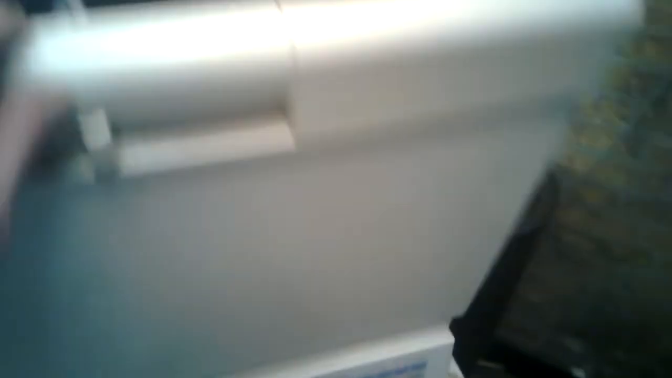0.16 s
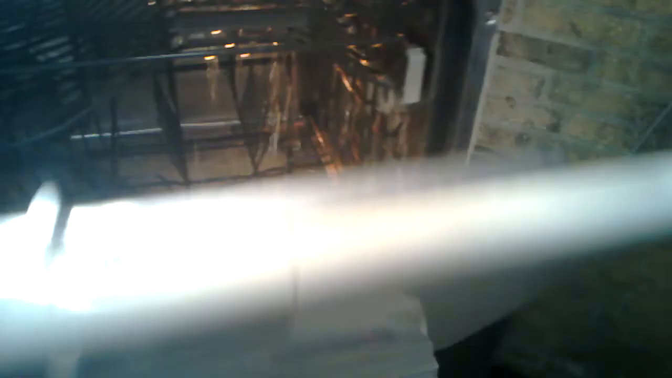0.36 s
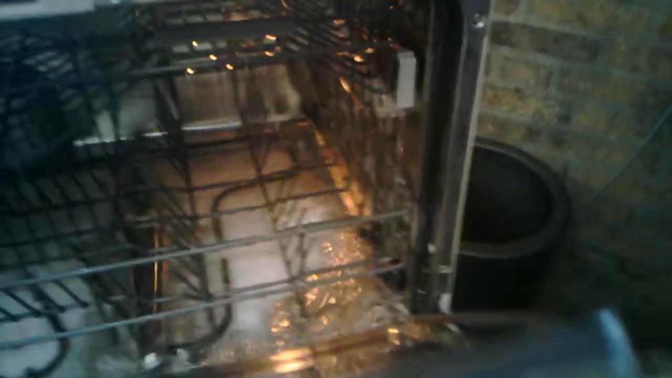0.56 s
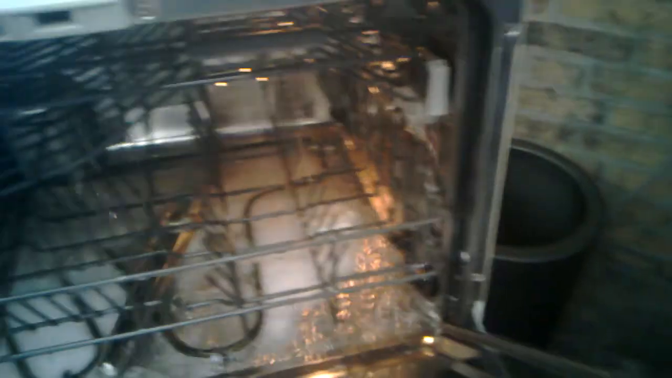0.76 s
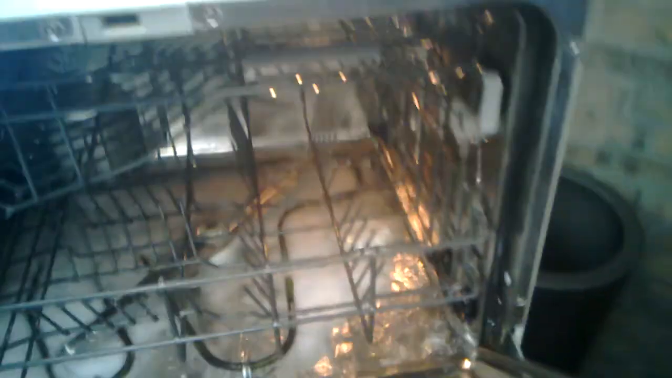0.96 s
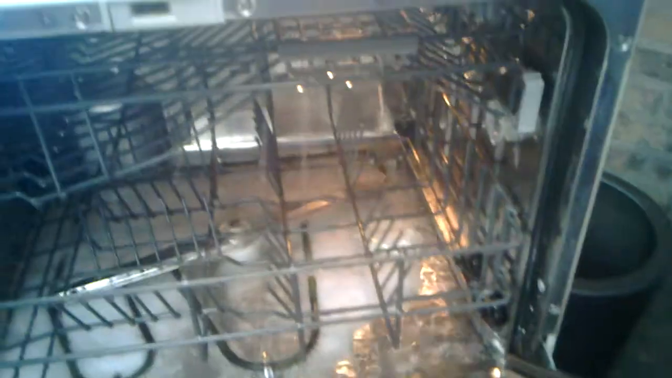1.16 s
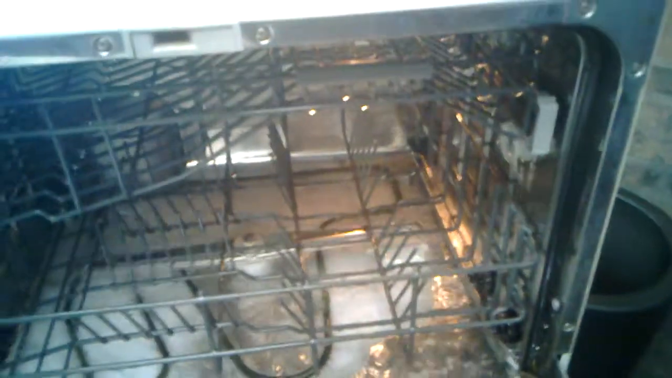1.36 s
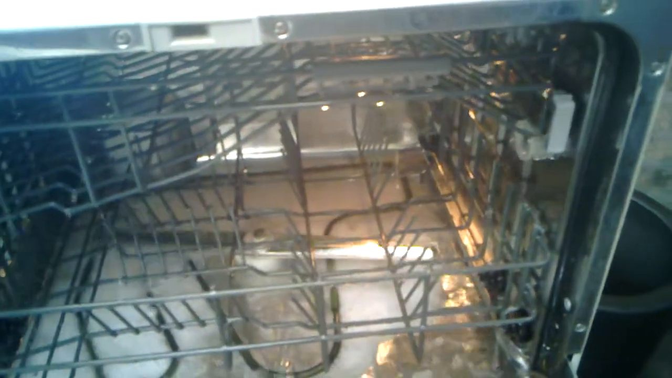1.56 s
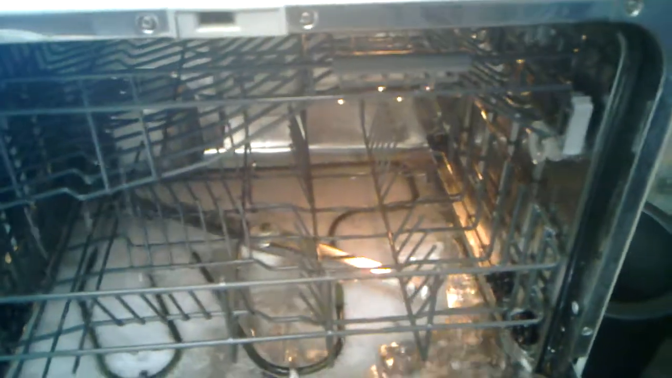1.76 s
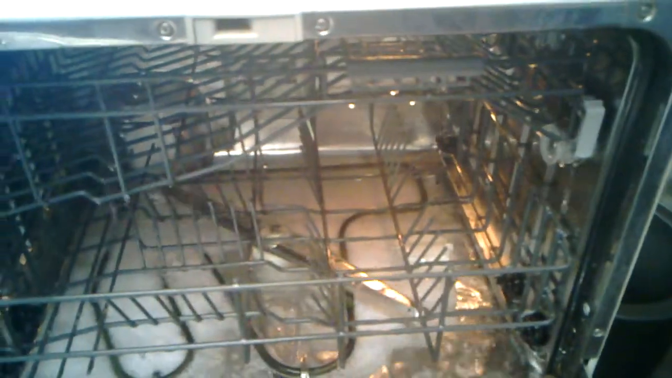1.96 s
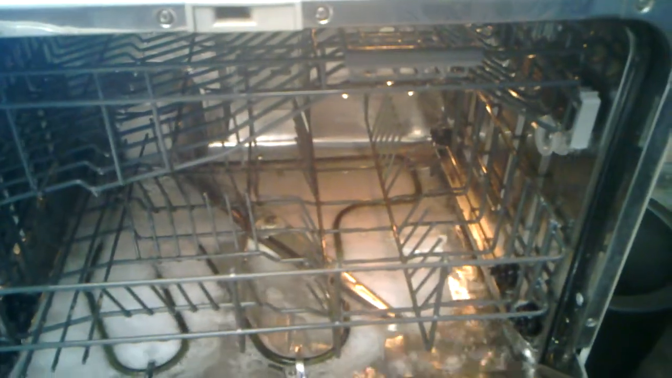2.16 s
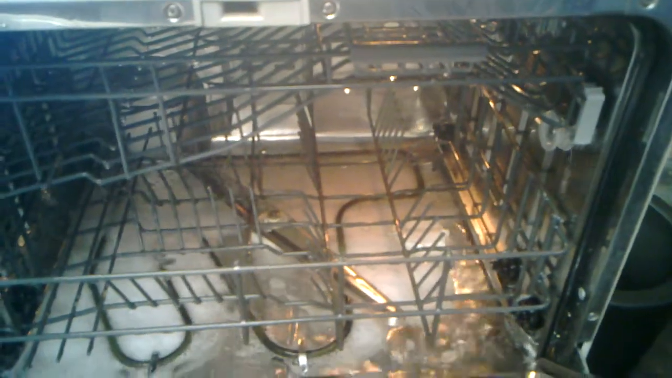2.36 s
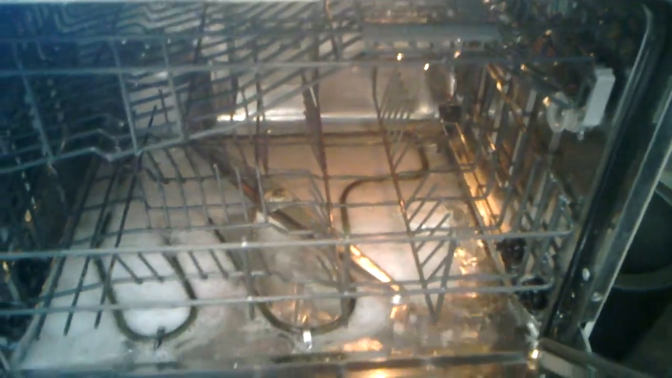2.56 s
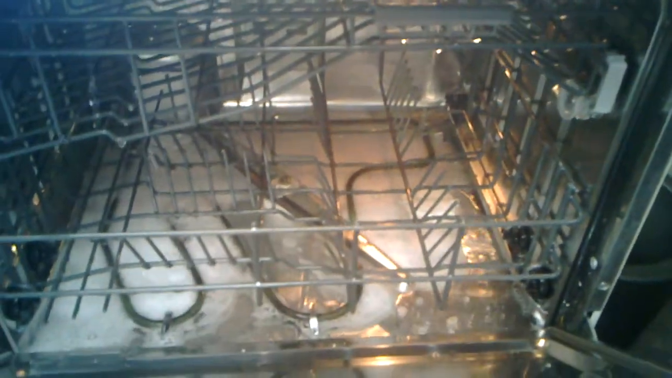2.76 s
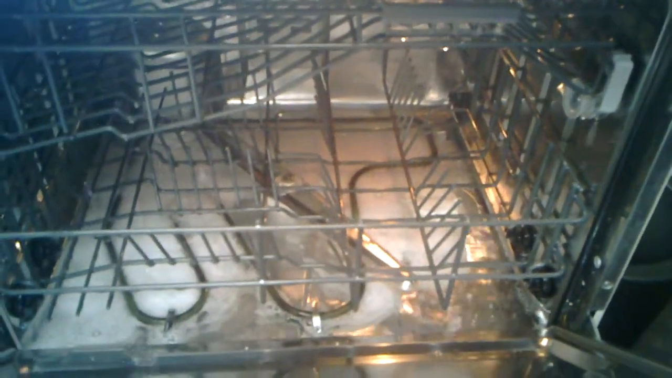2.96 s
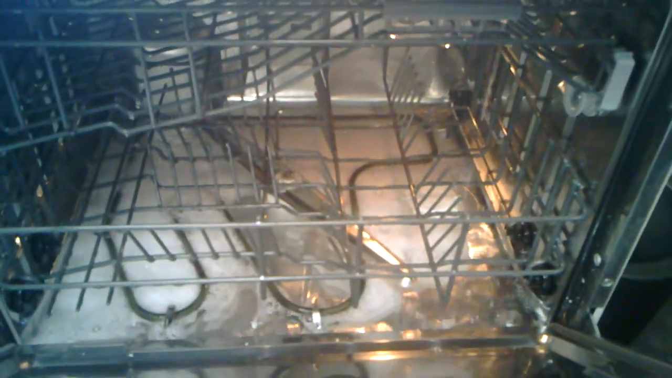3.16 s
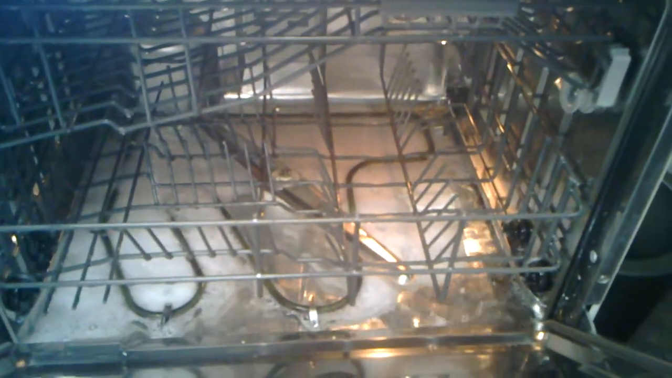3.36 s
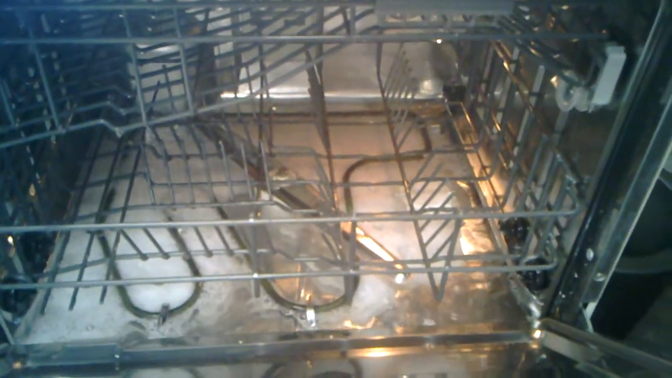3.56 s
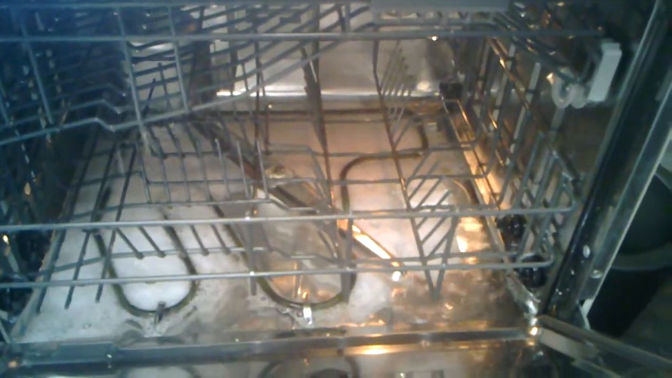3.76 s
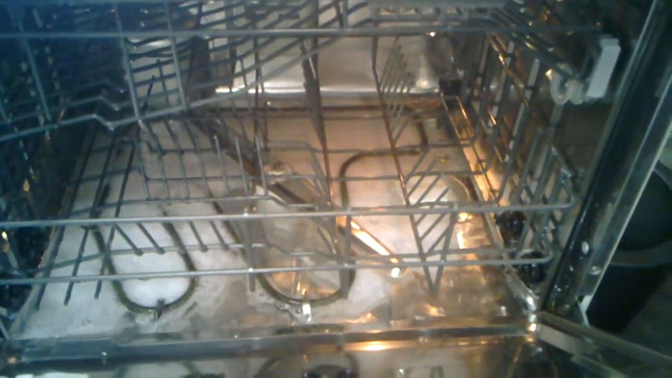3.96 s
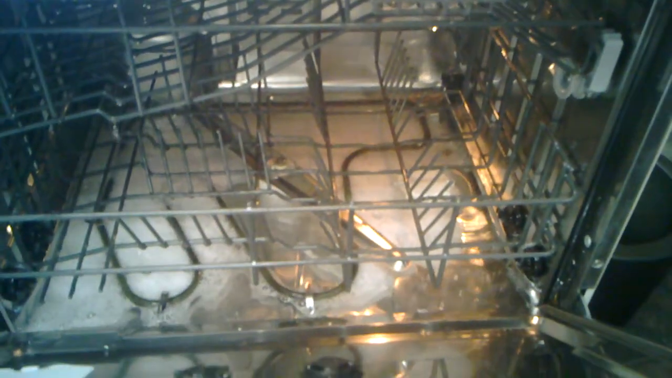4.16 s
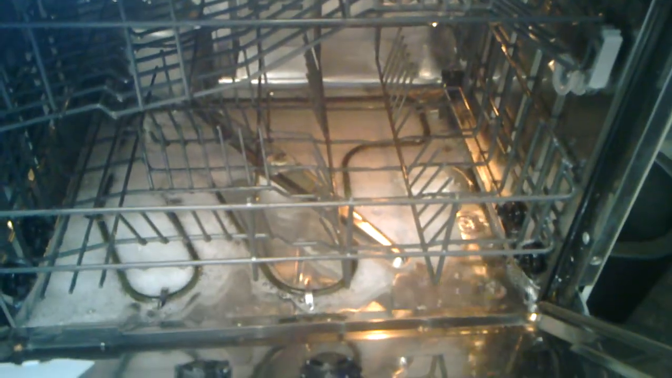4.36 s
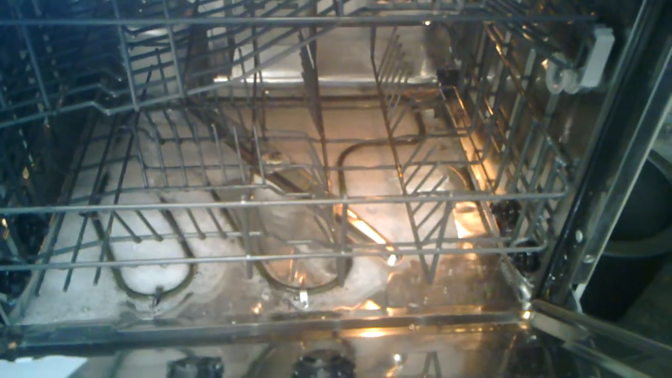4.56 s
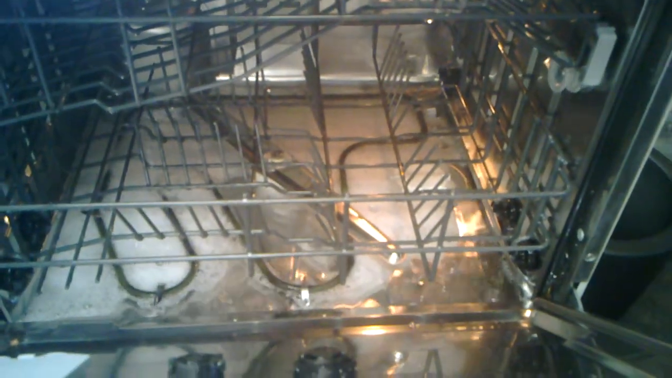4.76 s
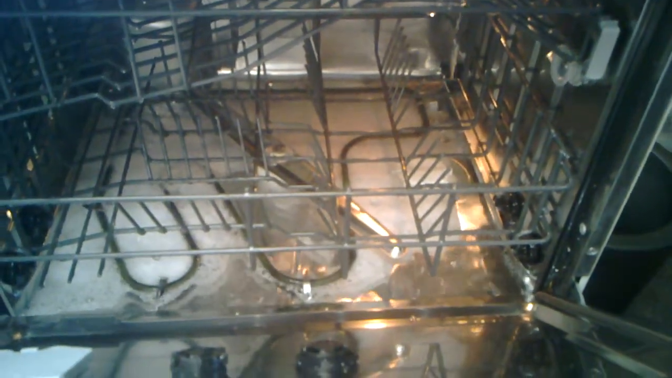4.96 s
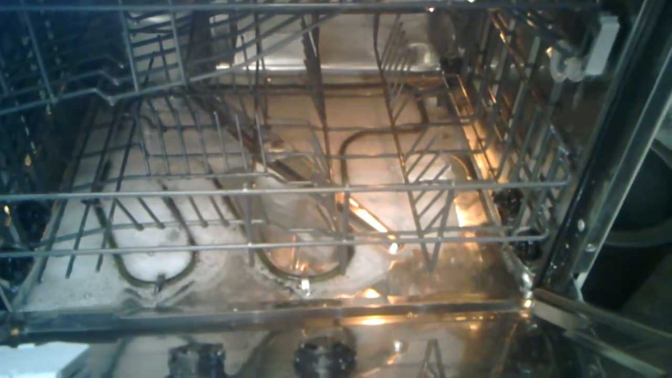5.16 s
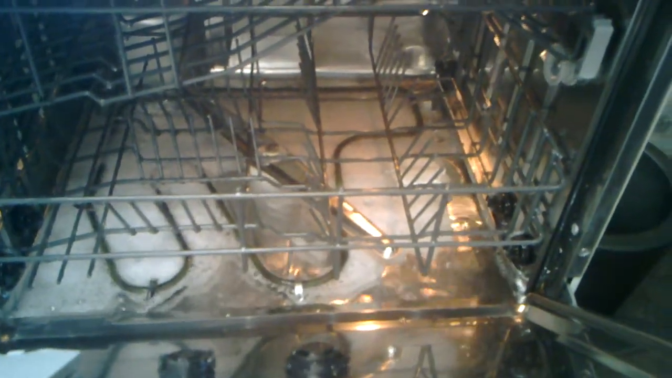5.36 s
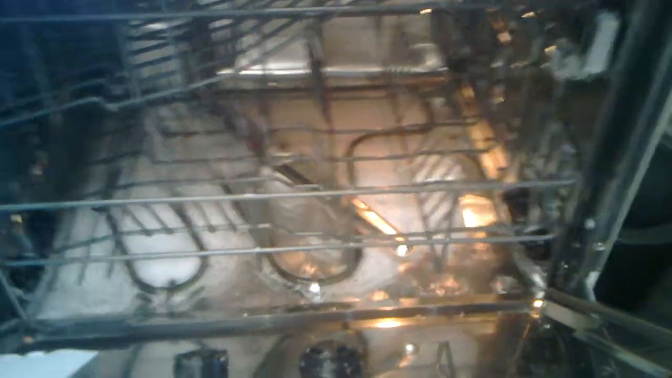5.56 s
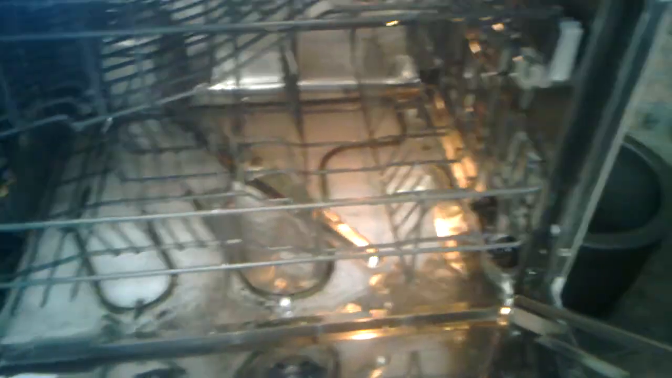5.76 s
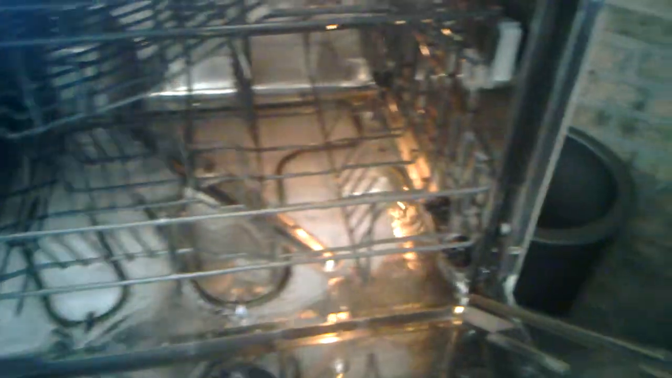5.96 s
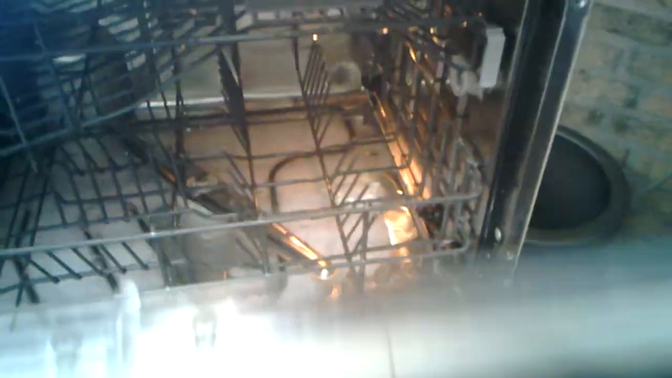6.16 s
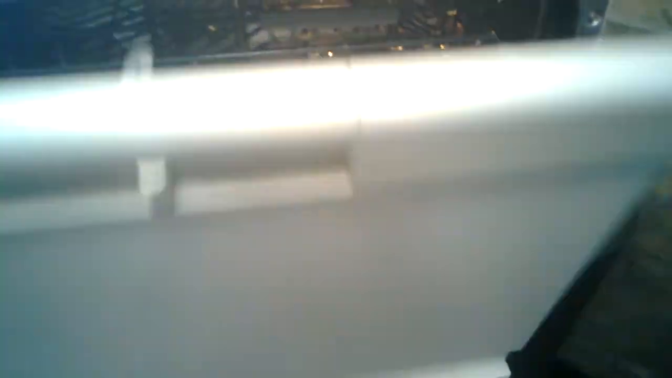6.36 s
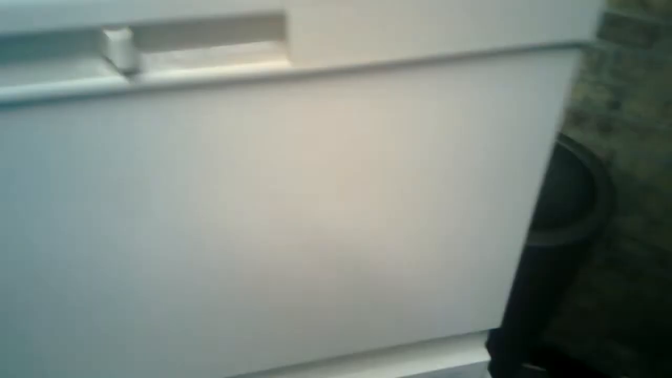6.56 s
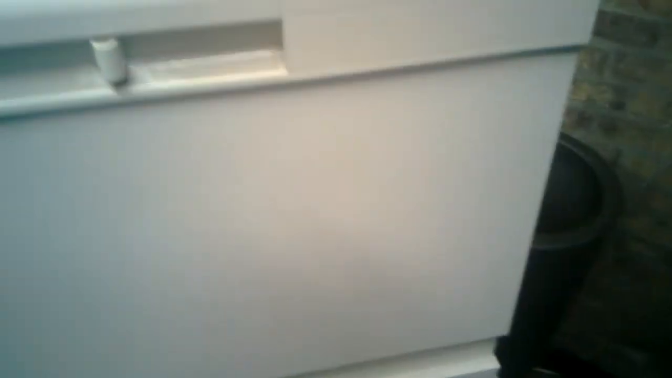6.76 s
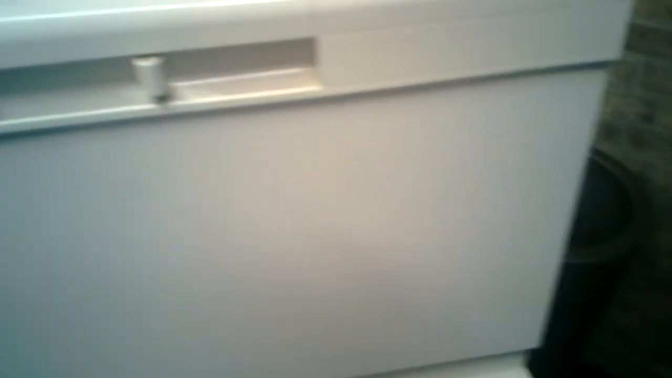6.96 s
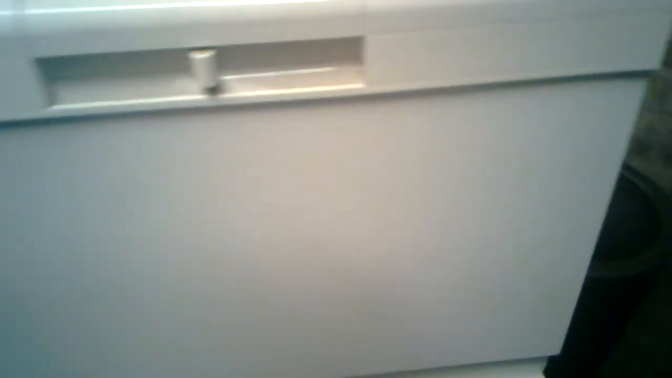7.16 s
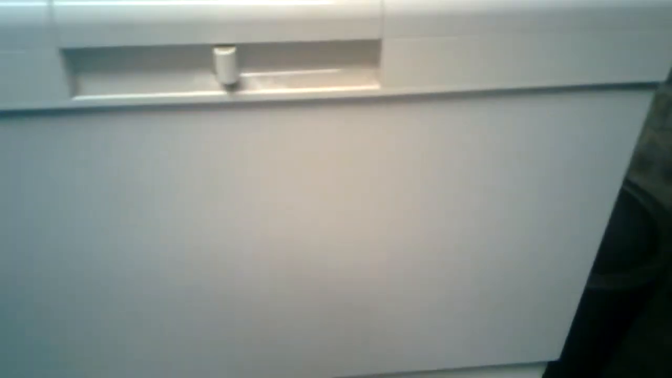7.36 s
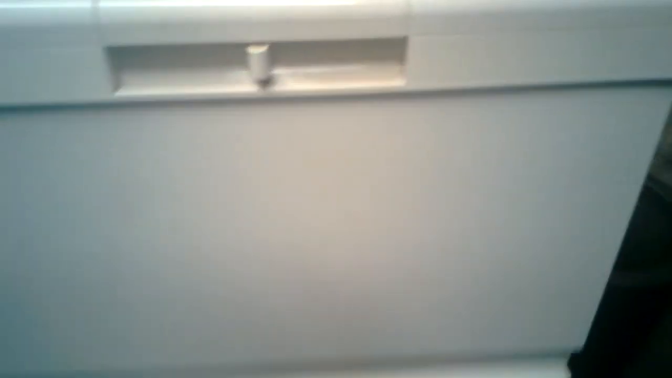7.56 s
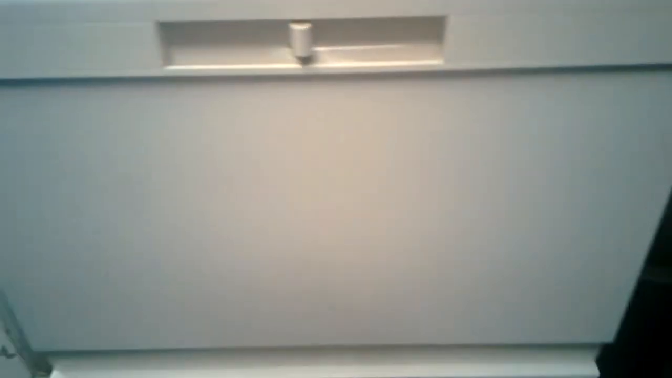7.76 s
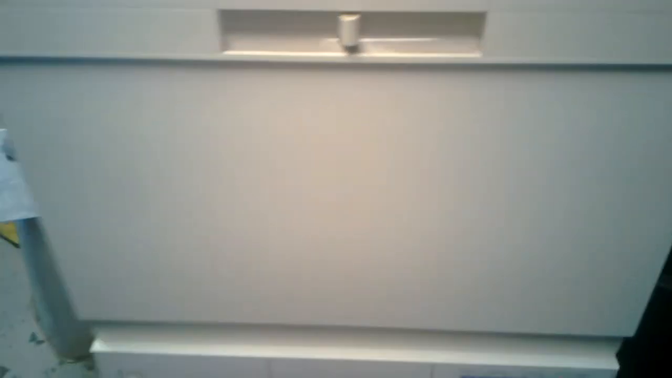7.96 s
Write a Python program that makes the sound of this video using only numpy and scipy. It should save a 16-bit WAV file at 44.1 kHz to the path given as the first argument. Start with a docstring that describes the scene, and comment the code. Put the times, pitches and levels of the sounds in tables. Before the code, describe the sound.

A running dishwasher is opened: its motor tone fades while jets of water slap the steel tub in bursts, slowing within about a second and a half. Drips plink into the sump, growing sparse. The door swings up with a creaky rub, knocks and latches with sharp clacks, then the pump starts, humming with muffled spray. Close microphone, small kitchen, soft hiss.

```python
"""A running dishwasher is pulled open: its motor cuts out and the slowing arm's jets, random impacts
through steel resonances, slap the tub. Gliding sine bubbles and noise ticks then drip into the sump.
The door swings up on a rubbing hinge, knocks shut (filtered noise bursts) and is latched.
The pump starts, gulping air; water hisses behind the door in coloured impacts and the cabinet hums.
Room hiss and a short kitchen echo lie under it all; layer levels are relative, set by the mix gains."""
import sys
import numpy as np
from scipy import signal
from scipy.fft import rfft, irfft
from scipy.io import wavfile

SR = 44100
rng = np.random.default_rng(int(sys.argv[2]) if len(sys.argv) > 2 else 0)


def wav_record(signal):
    """Record a signal, one row per channel, as 16-bit PCM in the file named by sys.argv[1]."""
    frames = np.transpose(np.atleast_2d(signal))
    bounded = np.clip(frames, -1, 1)
    # unit amplitude maps onto the largest positive 16-bit level
    quanta = np.round(bounded * 32767).astype(np.int16)
    wavfile.write(sys.argv[1], SR, quanta)


N = 353241
T = np.arange(N) / SR

ARM_SLOW_S = 1.12  # the spray arm has slowed
SWING_START_S, LATCH_S = 5.993, 6.46  # the door starts to swing; it meets its catch

# drops plinking into standing water: (time [s], level [dB], bubble pitch [Hz], t60 [s])
DRIP_EVENTS = [(0.329, -35, 2180, 0.068), (0.864, -49, 1106, 0.48), (0.964, -33, 1088, 0.12),
               (1.374, -43.5, 1476, 0.057), (1.427, -52.5, 1058, .08), (1.628, -55.5, 1630, 0.043),
               (1.787, -61, 3620, 0.026), (1.846, -49.5, 2920, 0.016), (1.9557, -34, 1470, 0.0057),
               (1.959, -46, 2570, 0.033), (2.0213, -30, 1750, 0.0069), (2.024, -44, 2130, 0.032),
               (2.0445, -32.5, 1120, 0.036), (2.059, -38, 1095, 0.082), (2.069, -41.5, 3130, 0.013),
               (2.131, -47, 1600, 0.01), (2.160, -43.5, 2063, 0.0068), (2.167, -32.5, 1010, 0.029),
               (2.268, -49.5, 3020, .025), (2.386, -57.5, 4250, 0.027), (2.732, -52, 2940, 0.015),
               (2.757, -51.5, 3030, 0.024), (2.760, -43.5, 1069, 0.043), (3.063, -52.5, 2460, 0.037),
               (3.076, -51, 2230, 0.049), (3.617, -57, 2110, 0.014), (3.679, -54, 1970, 0.029),
               (3.761, -53, 2270, 0.03), (3.822, -41.5, 3810, 0.014), (3.824, -37, 2390, 0.031),
               (3.832, -39, 2314, 0.039), (4.26, -60, 1090, .06), (4.302, -56.5, 2160, 0.016),
               (4.389, -56, 3210, 0.052), (4.525, -56, 1080, 0.055), (5.019, -61, 1080, .04),
               (5.113, -55, 2670, 0.0084), (5.165, -55.5, 4760, 0.01), (5.796, -62, 2350, 0.011),
               (5.817, -58.5, 3325, 0.047)]


def amp(db):
    """Decibels to gain."""
    return 10 ** (np.asarray(db) / 20)


def unit(x):
    """Scale a response to energy 1."""
    return x / np.sqrt(np.sum(x ** 2))


def fall(t, t60):
    """Exponential decay, 60 dB in t60 seconds."""
    return np.exp(-np.log(1000) * np.maximum(t, 0) / t60)


def stroke(start_s, rise_s, t60):
    """Envelope that rises straight, then dies away."""
    return np.clip((T - start_s) / rise_s, 0, 1) * fall(T - start_s - rise_s, t60)


def through(x, response):
    """Pass a sound through an impulse response."""
    return signal.oaconvolve(x, response)[:len(x)]


def add(out, s, x):
    """Mix x into out from time s."""
    i = max(int(s * SR), 0)
    out[i:i + len(x)] += x[:N - i]


def bandpass(x, edges_hz):
    """Second-order Butterworth band-pass."""
    return signal.sosfilt(signal.butter(2, edges_hz, "band", fs=SR, output="sos"), x)


def colour(x, spectrum, size=4096):
    """Minimum-phase filter of energy 1 from (frequency [Hz], level [dB]) points."""
    hz, db = np.transpose(spectrum)
    freqs = np.maximum(np.arange(size // 2 + 1) * SR / size, 1)
    cepstrum = irfft(np.log(amp(np.interp(np.log(freqs), np.log(hz), db))))
    # fold the cepstrum to make the filter causal
    cepstrum[1:size // 2] *= 2
    cepstrum[size // 2 + 1:] = 0
    return through(x, unit(irfft(np.exp(rfft(cepstrum)))))


def ring(x, modes, size=12000):
    """Damped modes, each with its own share of the energy."""
    t, response = T[:size], 0
    for hz, width_hz, db in modes:
        mode = np.exp(-np.pi * width_hz * t) * np.sin(2 * np.pi * hz * t)
        response = response + amp(db) * unit(mode)
    return through(x, unit(response))


def echoes(x, t60, gap_s, size=16000):
    """Dense decaying reflections that begin after a short gap."""
    t = T[:size]
    return through(x, unit(rng.standard_normal(size) * fall(t, t60) * (t > gap_s)))


def patter(rate):
    """Random impacts, `rate` a second on average, rms near 1."""
    return (rng.random(N) < rate / SR) * rng.standard_normal(N) * np.sqrt(SR / rate)


def walk(rate):
    """Random drift: straight lines between `rate` Gaussian points a second."""
    return np.interp(T * rate, np.arange(2048), rng.standard_normal(2048))


def plinks(rows, rise_cycles, glide, size=9000):
    """Each bubble swells within a cycle or so, rings down and rises in pitch by the glide."""
    out, t = np.zeros(N), T[:size]
    for s, db, hz, t60 in rows:
        swell = (1 - np.exp(-(t * hz / rise_cycles) ** 2)) * fall(t, t60)
        cycles = np.cumsum(hz * (1 + glide * (.5 - fall(t, t60)))) / SR
        add(out, s, amp(db) * swell / swell.max() * np.sin(2 * np.pi * cycles))
    return out


def grains(rate, low_hz, high_hz, cycles, spread_db, size=900):
    """Tiny bubbles of random pitch and strength, each ringing for a few cycles."""
    out, t = np.zeros(N), T[:size]
    starts = np.flatnonzero(rng.random(N) < rate / SR)
    for i, (pitch, strength) in zip(starts, rng.random((len(starts), 2))):
        hz = low_hz * (high_hz / low_hz) ** pitch
        ping = unit(np.sin(2 * np.pi * hz * t) * fall(t, cycles / hz))
        level = 2 * amp(-spread_db * np.sqrt(strength)) * np.sqrt(SR / rate[i])
        add(out, i / SR, ping * level)
    return out


def shimmer(x, depth_db, rate):
    """Each half-octave swells and sinks on its own as the point of impact wanders."""
    spectrum, out = rfft(x), 0
    hz = np.maximum(np.arange(len(spectrum)) * SR / N, 1)
    place = np.clip(2 * np.log2(hz / 300), 0, 10)  # half-octaves above 300 Hz
    for band in range(11):
        gain = amp(depth_db * walk(rate))
        part = irfft(spectrum * np.maximum(1 - np.abs(place - band), 0), N)
        out = out + part * gain / np.sqrt(np.mean(gain ** 2))
    return out


def room_hiss():
    """Steady background hiss: coloured noise with a slight drift in level."""
    # spectrum: (frequency [Hz], level [dB])
    room_spectrum = [(15, -23), (44, -20), (120, -12), (300, -9.5), (527, -13), (1060, -11), (1300, -13.5),
                     (2260, -12.5), (2820, -17), (3950, -19.5), (4600, -25.5), (11100, -23.5), (14700, -26),
                     (16000, -22)]
    return colour(rng.standard_normal(N), room_spectrum) * amp(-69.5 + .5 * walk(3.46))


def cabinet_rumble():
    """Low noise of the cabinet, at rest, shaken by the door and driven by the jets."""
    # spectrum: (frequency [Hz], level [dB])
    cabinet_spectrum = [(15, -26), (30, -5), (48, 2), (70, -5), (105, -5), (170, -9), (500, -46.5)]
    rest_db, shaken_db, shaken_t60_s = -79.5, -72, 5.7
    shaking = amp(rest_db + 1.6 * walk(4.7))
    shaking += amp(shaken_db) * stroke(LATCH_S, .15, shaken_t60_s)
    shaking += amp(-38) * np.sqrt(showers())
    return colour(rng.standard_normal(N), cabinet_spectrum) * shaking


def gulps():
    """Gulps of air in the filling pump ring as bubbles."""
    # (time [s], level [dB], pitch [Hz], t60 [s])
    gulp_events = [(7.337, -50, 955, 0.043), (7.3675, -35, 425, 0.019), (7.368, -46.5, 720, 0.012),
                   (7.391, -46, 1720, .035)]
    return plinks(gulp_events, rise_cycles=0.9, glide=0.018)


def pump():
    """Motor tones die at the opening; later noise drives the cabinet and spray patters on the door."""
    # motor tones as it cuts out: (frequency [Hz], level [dB])
    motor_tones = [(113, -47), (226, -55.5), (393, -57)]
    # spray on the door, then pump noise: (frequency [Hz], level [dB])
    wash_spectrum = [(240, -40), (400, -3.5), (520, -25), (700, -6), (1150, 1), (1350, -3.5), (1720, 2.5),
                     (2200, 0), (3000, -9), (4100, -20.5), (9400, -26.5), (14000, -27.5)]
    pump_spectrum = [(25, -20), (70, -15), (110, -18), (150, 6), (280, 1), (370, -5.5), (550, -6.5),
                     (1200, -33.5)]
    # driven cabinet resonances: (frequency [Hz], width [Hz], level [dB])
    hum_modes = [(101.4, 2.7, -16.5), (136, 2.3, -5.5), (160.5, 3.5, -3), (216, 14, -10), (262, 14, -12),
                 (280.2, 6, -0.5)]
    start_s, rise_s = 6.828, 0.044
    wash_db, wash_surge_db, wash_surge_t60_s, shut_wash_db = -63, -56, 1.72, -69.5
    load_db, load_surge_db, load_surge_t60_s = -61.5, -63, 0.29
    swell_s, swell_width_s, swell_db = 7.95, 0.053, -58.5  # the hum swells briefly
    arm_pass_s, arm_period_s, arm_sweep_db = 7.11, 0.48, 1.5  # the arm sweeps past the door

    tones = sum(amp(db) * np.sin(2 * np.pi * hz * T) for hz, db in motor_tones)
    cut_out = tones * fall(T - .05, 0.35) * np.minimum(T / 0.0022, 1)

    running = np.clip((T - start_s) / rise_s, 0, 1)
    pressure = amp(wash_db) * running
    pressure += amp(wash_surge_db) * stroke(start_s, rise_s, wash_surge_t60_s)
    # water still running behind the door before the motor is up
    pressure += amp(shut_wash_db) * (T > LATCH_S) * (1 - running)
    sweep_db = arm_sweep_db * np.cos(2 * np.pi * (T - arm_pass_s) / arm_period_s)
    spray = colour(patter(2500), wash_spectrum) * pressure * amp(sweep_db + 1.15 * walk(30))

    load = amp(load_db) * running
    load += amp(load_surge_db) * stroke(start_s, rise_s, load_surge_t60_s)
    swell = amp(swell_db) * np.exp(-((T - swell_s) / swell_width_s) ** 2)
    impeller = rng.standard_normal(N) * (load + swell)
    rumble = amp(-4.5) * colour(impeller, pump_spectrum)
    hum = amp(-3.5) * ring(impeller, hum_modes, size=40000)
    return cut_out + spray + rumble + hum


def latch():
    """The tongue scrapes over the catch; the door thumps as it squeezes its seal."""
    # tongue strokes: (time [s], level [dB], rise [s], t60 [s])
    scrape_events = [(6.458, -38.5, 0.0024, 0.13), (6.488, -46, 0.0073, 0.054)]
    # catch resonances: (frequency [Hz], width [Hz], level [dB])
    catch_modes = [(2520, 110, 6), (2850, 110, -7), (2880, 74, -6)]
    # seal thumps: (time [s], level [dB], pitch [Hz], t60 [s])
    thump_events = [(6.5175, -45, 70, 0.03), (6.520, -42.5, 160, 0.029), (6.895, -41.5, 248, 0.038),
                    (6.927, -44.5, 241, 0.081), (6.928, -51, 70.5, .1)]
    force = sum(amp(db) * stroke(s, rise, t60) for s, db, rise, t60 in scrape_events)
    scrape = ring(patter(2700) * force, catch_modes)
    return scrape + plinks(thump_events, rise_cycles=0.11, glide=0)


def door_speed(bend=1.28):
    """The door gathers speed, then is eased home; 1 at its fastest."""
    fast_s, end_s = 6.136, 6.75
    return np.interp(T, [SWING_START_S, fast_s, end_s], [0, 1, 0]) ** bend


def hinge_rub():
    """Impacts in the hinge follow the door's speed; creaks where it catches."""
    # (time [s], level [dB], t60 [s])
    creak_events = [(5.929, -65, 0.17), (5.963, -60, 0.23), (6.085, -60.5, 0.19)]
    # spectrum: (frequency [Hz], level [dB])
    hinge_spectrum = [(60, -38), (110, -12.5), (240, -14), (374, 1), (430, -5.5), (530, -9), (730, 1),
                      (960, -10.5), (1350, -6), (2300, -14.5), (3500, -23.5), (4500, -30), (9000, -39)]
    rubbing = amp(-55.5) * door_speed()
    rubbing += sum(amp(db) * stroke(s, 0.0035, t60) for s, db, t60 in creak_events)
    return colour(patter(2500), hinge_spectrum) * rubbing * amp(1.7 * walk(55))


def door(contact_s=0.0038, touch_s=0.0028, click_rattle_db=-4, part_width=0.18, size=16000):
    """Each blow rings the struck part and the panel, shakes the racks and adds a metal click."""
    # door and latch blows: (time [s], level [dB], contact cut-off [Hz], struck-part pitch [Hz],
    # metal click [dB], rattle [dB], rattle t60 [s])
    blow_events = [(6.162, -31.5, 1620, 835, -30, -3.5, 0.22),
                   (6.460, -36.5, 4970, 2600, -10.5, -7.5, 0.39),
                   (6.468, -32.5, 700, 328, -28, -11.5, 0.12), (6.509, -43.5, 3500, 2460, -33, -1, 0.18),
                   (6.519, -36.5, 1300, 1160, -26, -5, 0.11), (6.538, -30.5, 6000, 2230, -3, -6, 0.21),
                   (6.571, -48.5, 3520, 1210, -6.5, 8, 0.2), (6.893, -45.5, 2740, 1800, -20.5, 3, 0.34),
                   (6.926, -55, 2800, 1900, -13, -7, 0.17), (7.219, -59, 2500, 1710, -25, -1.5, 0.12),
                   (7.884, -49.5, 1170, 870, -18, -7, 0.48)]
    # panel, then metal click: (frequency [Hz], level [dB])
    door_spectrum = [(60, -38.5), (200, 1.5), (500, -7), (750, 4.5), (1700, 7), (2100, 7.5), (2700, 2),
                     (3600, -1.5), (4400, -29), (8000, -26), (15000, -20)]
    latch_spectrum = [(1000, -21), (4000, 3), (5500, -1), (7500, 1.5), (11000, 3.5), (13000, -5),
                      (16000, -16)]
    # panel resonances: (frequency [Hz], width [Hz], level [dB])
    door_modes = [(289, 17, -2), (394, 19, 1.5), (664, 20, 2), (757, 20, -5.5), (1040, 29, -27),
                  (1094, 24, 2), (1206, 34, 6), (1500, 17, -9), (1645, 28, -9), (1694, 16, 3.5),
                  (1731, 17, -2), (2470, 34, -10), (2378, 14, 5), (2620, 31, 3)]
    panel, metal, parts, t = np.zeros(N), np.zeros(N), np.zeros(N), T[:size]
    for s, db, cut_hz, part_hz, click_db, rattle_db, t60 in blow_events:
        grit = amp(db) * rng.standard_normal((3, size)) * np.minimum(t / touch_s, 1)
        contact = np.exp(-(t / contact_s) ** 4)
        rattle = amp(rattle_db) * fall(t, t60)
        soft = signal.butter(1, min(cut_hz, .45 * SR), fs=SR)
        add(panel, s, signal.lfilter(*soft, grit[0] * (contact + rattle)))
        add(metal, s, amp(click_db) * grit[1] * (contact + amp(click_rattle_db) * rattle))
        part_mode = [(part_hz, part_width * part_hz, 0)]
        add(parts, s, ring(grit[2] * (contact + amp(-3) * rattle), part_mode, size=2000))
    hinge = hinge_rub()
    # the hinge is fixed to the panel and makes it sing too
    singing = ring(panel + amp(-12) * hinge, door_modes)
    knock = amp(0.5) * colour(panel, door_spectrum) + amp(-7.0) * singing + amp(-6) * parts
    return knock + colour(metal, latch_spectrum) + hinge


def runoff():
    """Strength of the sheet of water on the walls: it thins, then breaks up."""
    start_db, sag_db_per_s, end_s, end_t60_s = -51, 7, 2.1, 2
    return amp(start_db - sag_db_per_s * T) * fall(T - end_s, end_t60_s)


def showers(rise_s=0.0044):
    """Power of the jets: each sets in fast, holds while it crosses the wall and dies away."""
    # jets striking the tub: (time [s], level [dB], length [s])
    jet_events = [(0.004, -41.5, 0.031), (0.097, -49, 0.015), (0.135, -41, 0.027), (0.184, -41, 0.034),
                  (0.306, -40.5, 0.047), (0.378, -42.5, 0.0075), (0.417, -38, 0.025), (0.457, -35.5, .014),
                  (0.532, -36.5, 0.069), (0.651, -42.5, 0.015), (0.719, -35.5, 0.0095),
                  (0.75, -39.5, 0.033), (0.854, -43.5, 0.02), (0.894, -38.5, 0.018), (0.954, -39, 0.013),
                  (1.044, -39.5, 0.0051), (1.101, -43.5, 0.014), (1.131, -41.5, 0.0094),
                  (1.155, -39, 0.013), (1.194, -47, 0.032), (1.262, -57, 0.011), (1.319, -43, .019),
                  (1.378, -57, 0.012), (1.536, -61, 0.0072), (1.627, -58.5, 0.014)]
    first_t60_s, last_t60_s = .16, 0.088  # decay shortens as the pressure drops
    power = np.zeros(N)
    for s, db, length in jet_events:
        t60 = np.interp(s, [0, ARM_SLOW_S], [first_t60_s, last_t60_s])
        power += (amp(db) * np.clip((T - s) / rise_s, 0, 1) * fall(T - s - length, t60)) ** 2
    return power


def ticks(spread=0.31, t60=0.011, size=2500):
    """A droplet bursts on racks or bare steel in a brief, bright spit of noise."""
    # (time [s], level [dB], centre [Hz])
    tick_events = [(0.5924, -38.5, 7300), (0.946, -41.5, 5320), (1.232, -45.5, 5600), (1.6904, -52.5, 6550),
                   (1.731, -53, 9300), (2.0182, -51.5, 9800), (2.2675, -45.5, 10100), (2.3453, -55, 6250),
                   (3.6169, -51.5, 6170), (3.6476, -53, 9700), (3.7738, -49, 5200), (4.331, -53, 9590),
                   (4.5236, -54.5, 11450), (4.69, -60, 6200), (5.165, -50, 9600), (6.387, -54, 9100)]
    out, t = np.zeros(N), T[:size]
    for s, db, hz in tick_events:
        edges = np.clip([hz / (1 + spread), hz * (1 + spread)], 100, .45 * SR)
        spit = bandpass(rng.standard_normal(size) * fall(t, t60), edges)
        add(out, s, amp(db) * spit / np.abs(spit).max())
    return out


def splats(t60=.035, size=5000):
    """A drop tears the surface with a short wet splat as it forms its bubble."""
    out, t = np.zeros(N), T[:size]
    for s, db, hz, _ in DRIP_EVENTS:
        edges = np.clip([hz / 1.54, hz * 1.43], 100, .45 * SR)
        # big drops put more of their energy into the bubble
        strength = amp(0.59 * db - 33)
        splat = bandpass(rng.standard_normal(size) * fall(t, t60), edges)
        add(out, s, strength * splat * np.sqrt(SR / 2 / np.diff(edges)))
    return out


def dripping(opening_s=0.21):
    """Plinks, splats, ticks and fine droplets, mirrored by the walls of the open tub."""
    # droplet mist, then fizz of the runoff: (frequency [Hz], level [dB])
    spray_spectrum = [(400, -30), (2000, -5.5), (4500, -17.5), (7000, -14), (9500, -5.5), (12000, -10),
                      (15500, -9.5)]
    fizz_spectrum = [(2000, -12), (5000, -6), (9500, -9), (12500, -4), (16000, -21)]
    mist_db, mist_per_s, halving_s = -60.5, 900, .26  # droplet count halves once the arm has slowed
    trickle_db, trickle_sag_db_per_s = -71, 1.5  # small drops running into the sump
    # how far the door stands open
    doorway = np.interp(T, [0, opening_s, SWING_START_S, LATCH_S], [0, 1, 1, 0])
    wet = 1 / (1 + np.maximum(T - ARM_SLOW_S, 0) / halving_s)  # share of droplets still falling

    flow = (amp(trickle_db - trickle_sag_db_per_s * T) + amp(-11) * runoff()) * doorway
    drops = grains(40 + 120 * wet, low_hz=1007, high_hz=4220, cycles=31, spread_db=15)
    trickle = drops * flow * amp(-2.0)
    # water creeping down the steel wall
    film = ring(patter(1500), [(2150, 500, 0)]) * flow * amp(-6.0 + 2.7 * walk(14))
    bubbles = plinks(DRIP_EVENTS, rise_cycles=0.84, glide=0.019) + trickle

    # every jet throws off more droplets
    thrown = amp(mist_db) * wet ** 0.74 + amp(-26) * np.sqrt(showers())
    specks = grains(mist_per_s * wet, low_hz=3900, high_hz=12400, cycles=18, spread_db=22)
    mist = colour(specks, spray_spectrum) * thrown * doorway
    fizz = colour(patter(9500), fizz_spectrum) * runoff() * amp(-18.0)

    droplets = amp(4.0) * ticks() + amp(1.0) * mist
    pool = amp(-1) * bubbles + amp(-3) * echoes(bubbles, t60=0.043, gap_s=.002)
    pool += amp(2.0) * splats(t60=0.063)
    bright = amp(-2.5) * droplets + amp(-4) * echoes(droplets, t60=0.045, gap_s=0.001)
    return pool + film + fizz + bright


def splashes(low_cut_hz=105):
    """Each jet is a shower of drops that drums on the tub, rings its steel wall and churns up bubbles."""
    # spectrum: (frequency [Hz], level [dB])
    splash_spectrum = [(25, -34), (75, -22.5), (110, 6.5), (180, 1), (330, -10), (600, -10.5), (900, -4.5),
                       (1600, -0.5), (2500, -1.5), (3300, -10), (4400, -22.5), (7000, -30.5), (10000, -28),
                       (15000, -54)]
    # tub, then steel-wall resonances: (frequency [Hz], width [Hz], level [dB])
    tub_modes = [(115.7, 6, -1.5), (126.5, 7.4, 5), (176.5, 7.7, -2), (226.6, 7.6, -5.5), (284, 33, -5.5),
                 (388.7, 16.4, -1.5), (481.6, 20, -4.5), (661, 18, -2), (904, 22, -15), (928.4, 45, 3),
                 (1123, 58, -1.5), (1182, 21, -2.5), (1358, 57, 0.5), (1426, 9.2, -2), (1639, 18, 2),
                 (1820, 22, -5.5), (1960, 5.7, 1.5), (1995, 16, -18), (2560, 4.2, -7), (3065, 33, -3),
                 (3835, 51, -6.5)]
    wall_modes = [(2380, 59, 11), (2570, 59, -7)]
    wall_db, wall_gain_db = -13.5, 16.5  # the wall rings more and more as the arm slows
    jets = showers()
    power = jets + (runoff() * amp(-1 + 2.5 * walk(28.1))) ** 2  # the runoff comes in dribbles
    wall_power = jets * amp(wall_db + wall_gain_db * np.minimum(T / ARM_SLOW_S, 1)) ** 2

    drops = patter(9000) * amp(np.clip(4.9 * walk(180), -3, 3))
    blows = shimmer(drops, depth_db=2.0, rate=45) * np.sqrt(power)
    churn_rate = np.where(T < 2, 300, 0)
    churn = grains(churn_rate, low_hz=546, high_hz=3170, cycles=22, spread_db=15, size=2500)
    churn = churn * np.sqrt(power)
    wall = ring(patter(9000) * np.sqrt(wall_power), wall_modes)

    tub = amp(-5.5) * colour(blows, splash_spectrum) + amp(-6.5) * ring(blows, tub_modes)
    tub += amp(-8.5) * churn + amp(-2.5) * wall
    # high-pass: keeps the splashes free of deep rumble
    return signal.sosfilt(signal.butter(4, low_cut_hz, "high", fs=SR, output="sos"), tub)


def scene():
    """The machine, a little of the kitchen's echo, and background hiss."""
    machine = splashes() + dripping() + door() + latch() + pump() + gulps() + cabinet_rumble()
    kitchen = amp(-16.5) * echoes(machine, t60=0.27, gap_s=0.0096)
    return (machine + kitchen + room_hiss())[None]


def record(dry):
    """A steep low-pass closes the treble."""
    top_hz = 15800
    return signal.sosfilt(signal.ellip(10, .2, 70, top_hz, fs=SR, output="sos"), dry)


dry = scene()
out = record(dry)
wav_record(out)
```